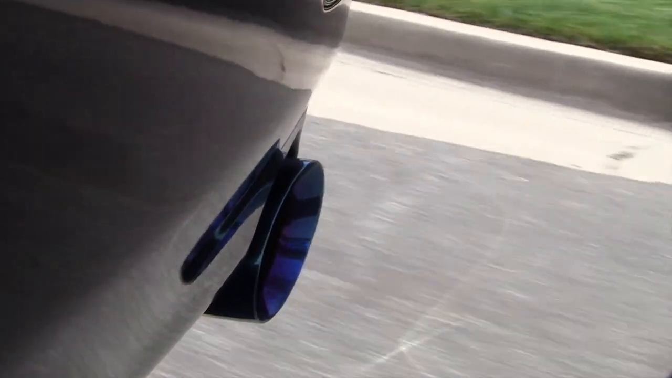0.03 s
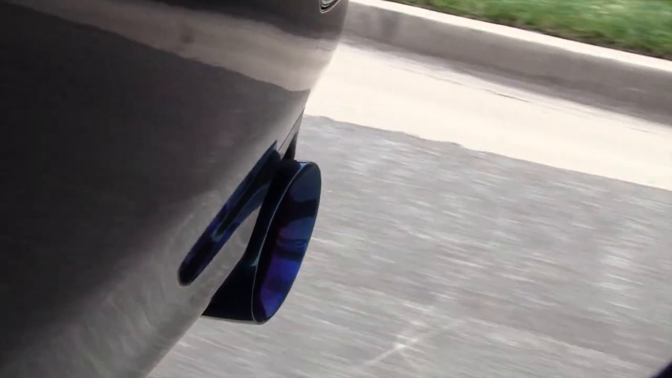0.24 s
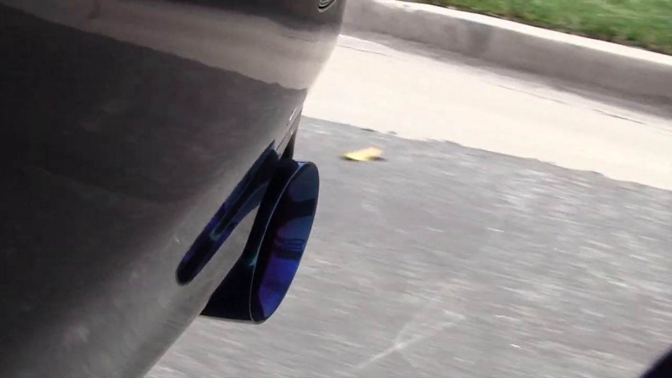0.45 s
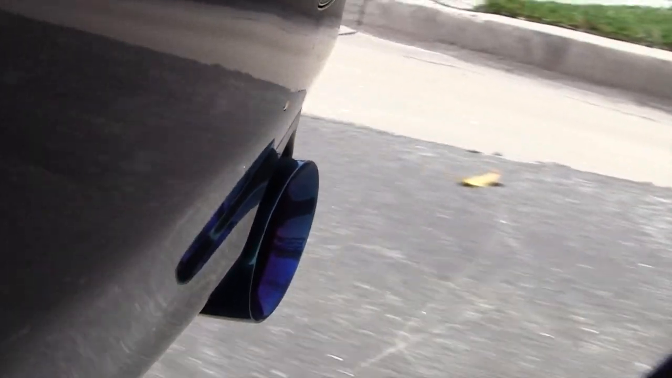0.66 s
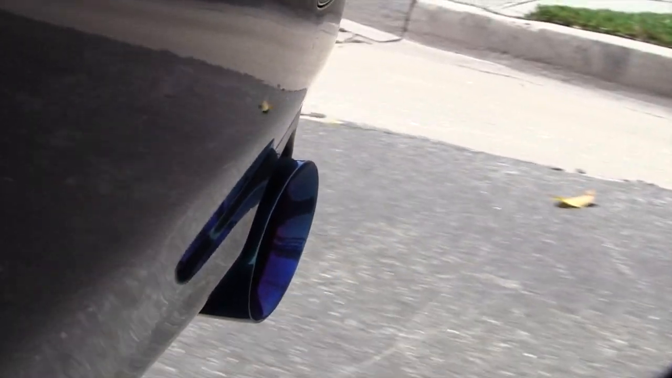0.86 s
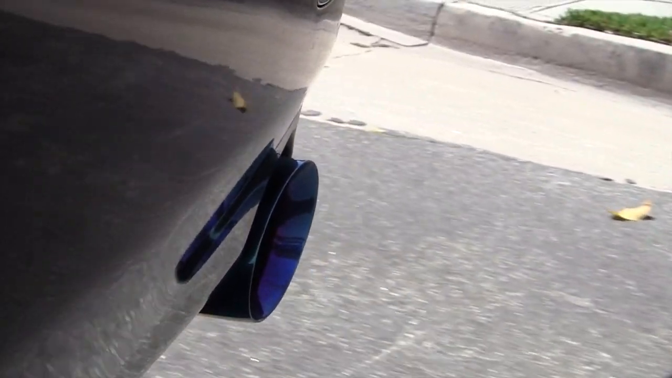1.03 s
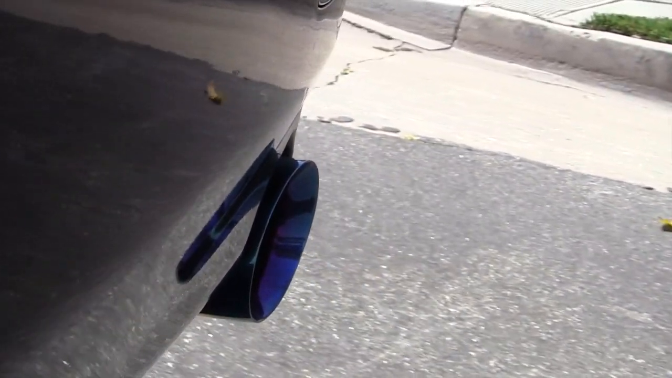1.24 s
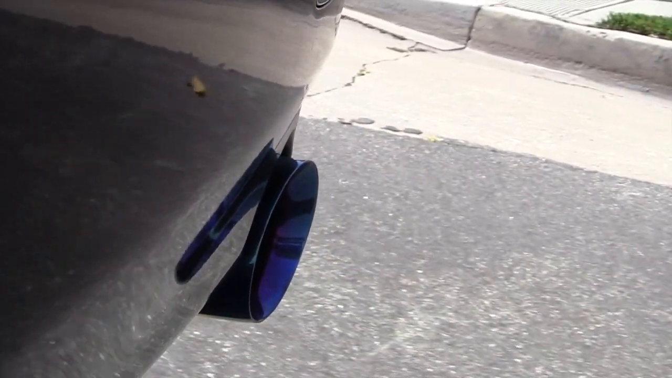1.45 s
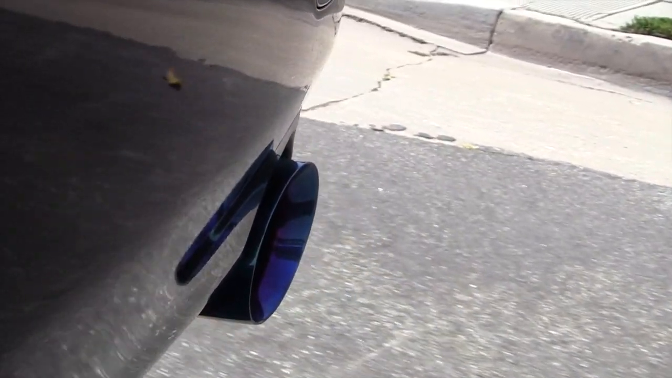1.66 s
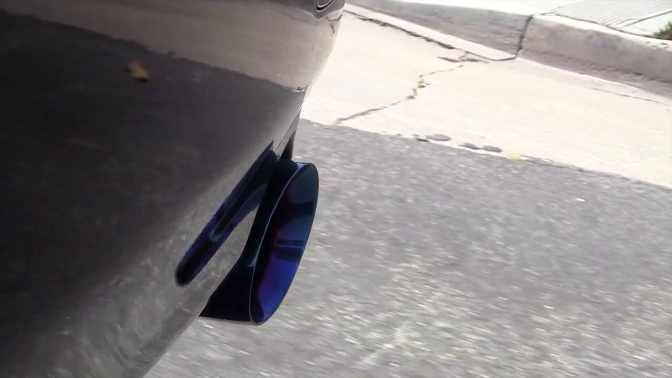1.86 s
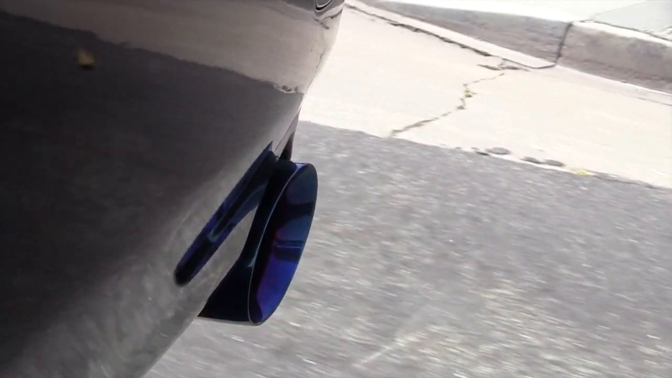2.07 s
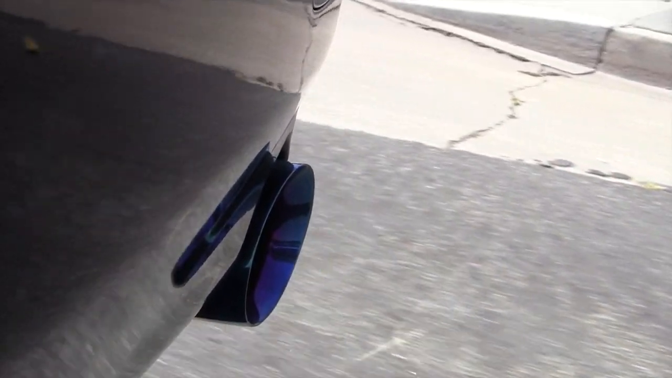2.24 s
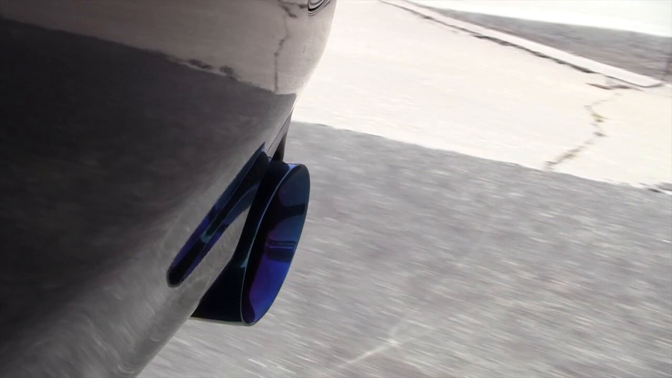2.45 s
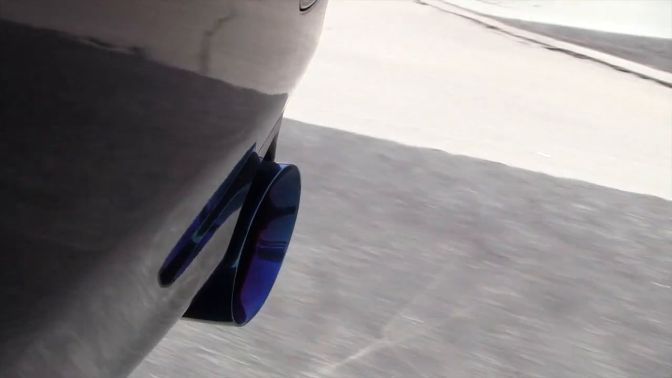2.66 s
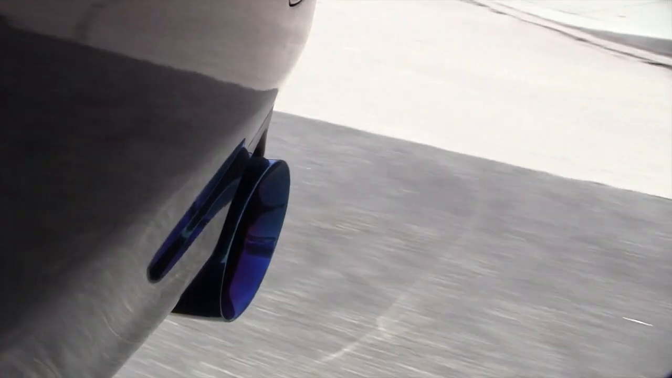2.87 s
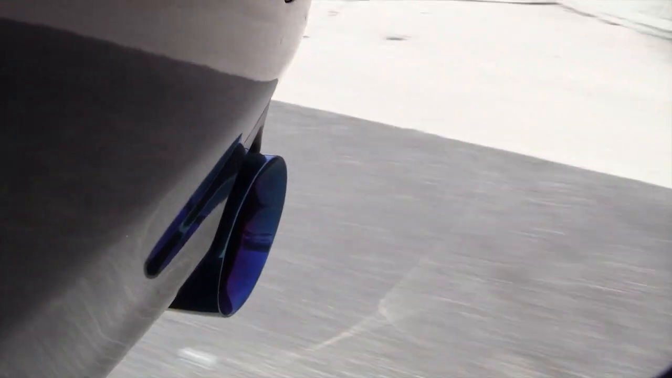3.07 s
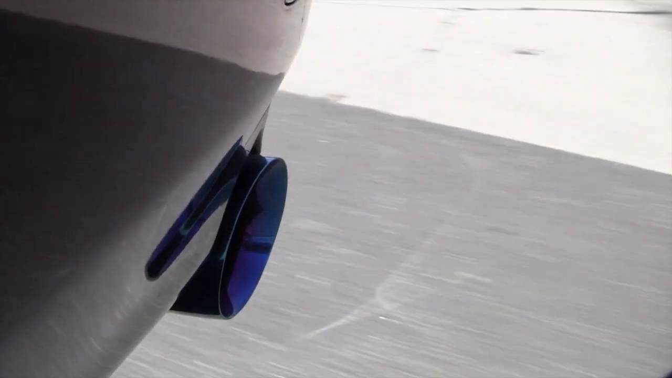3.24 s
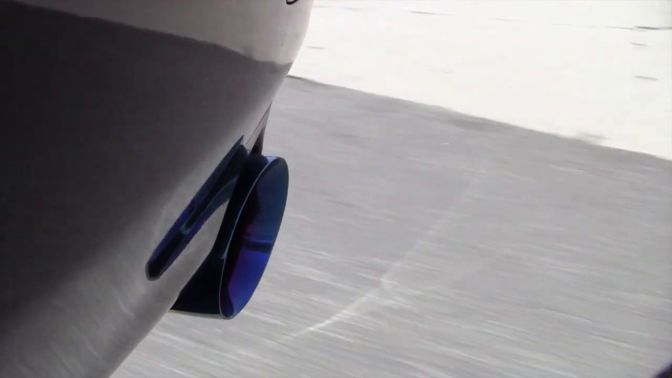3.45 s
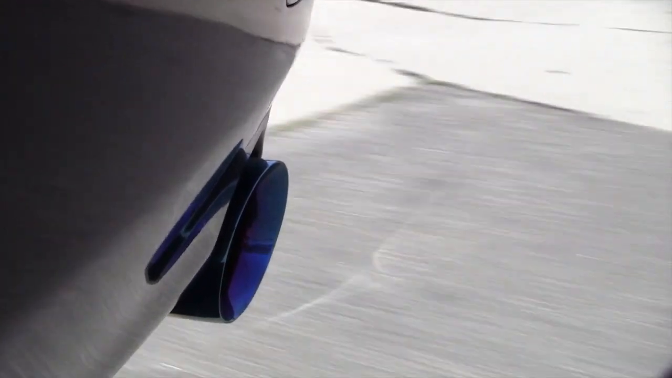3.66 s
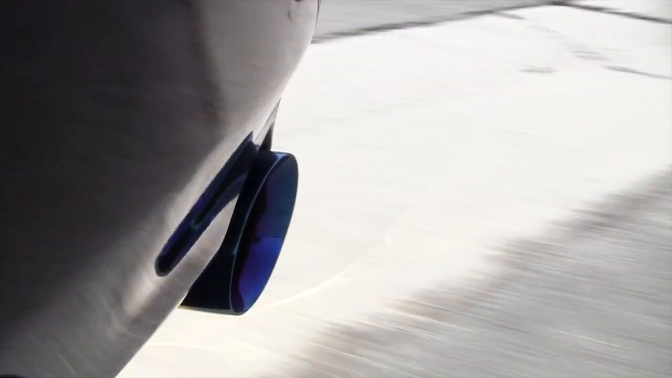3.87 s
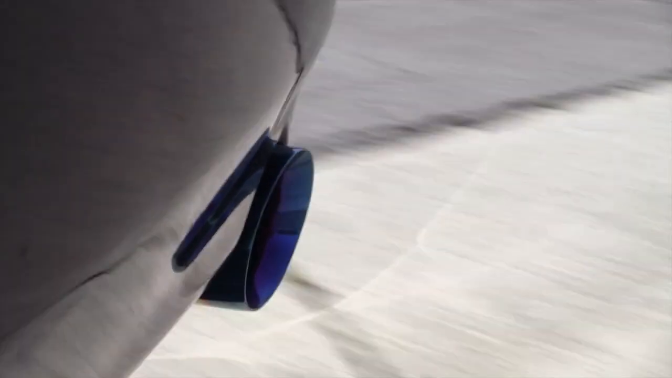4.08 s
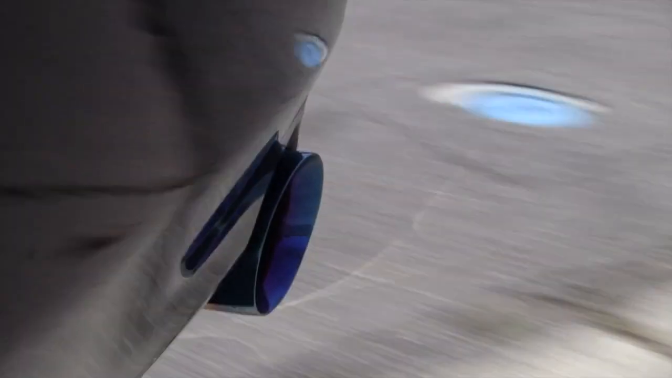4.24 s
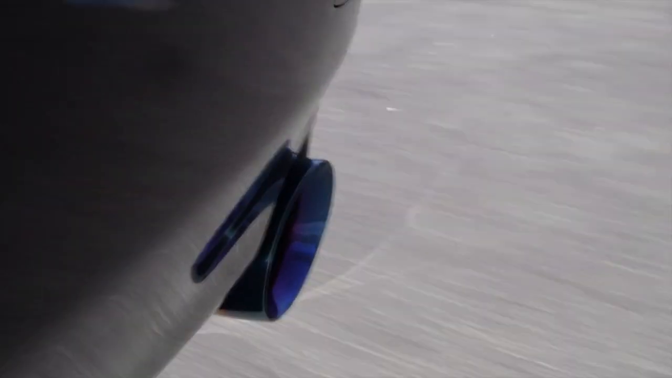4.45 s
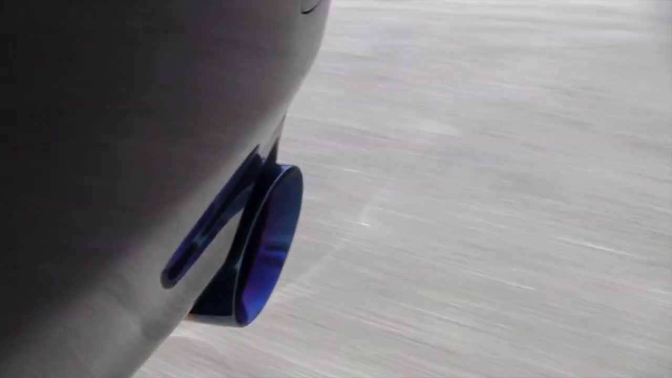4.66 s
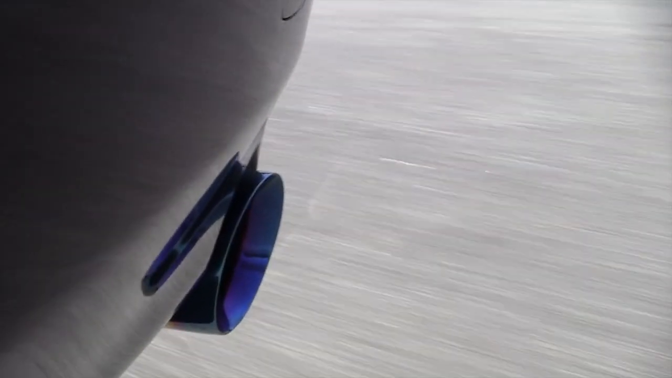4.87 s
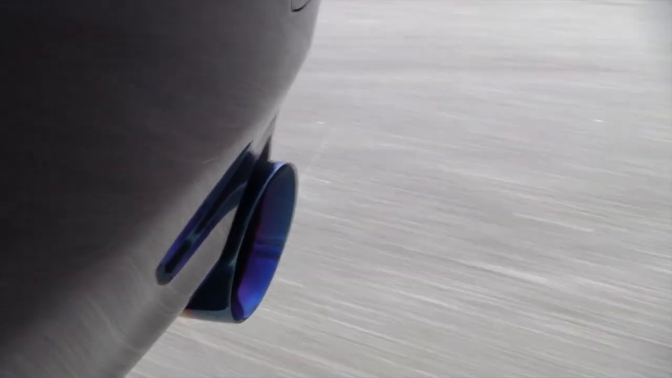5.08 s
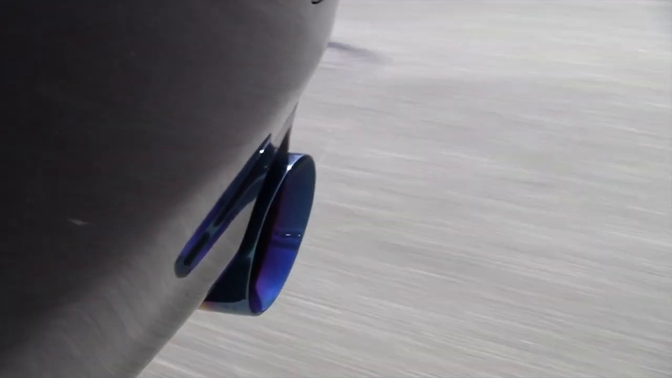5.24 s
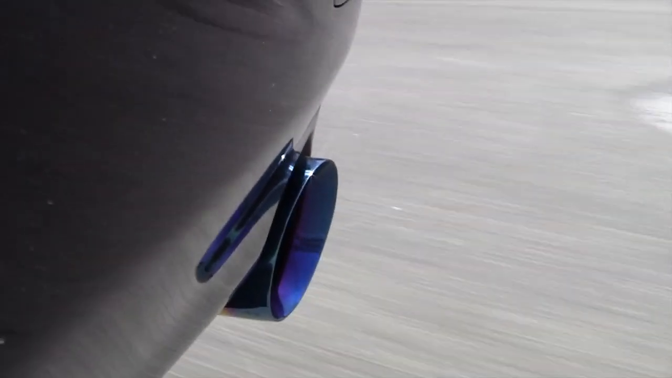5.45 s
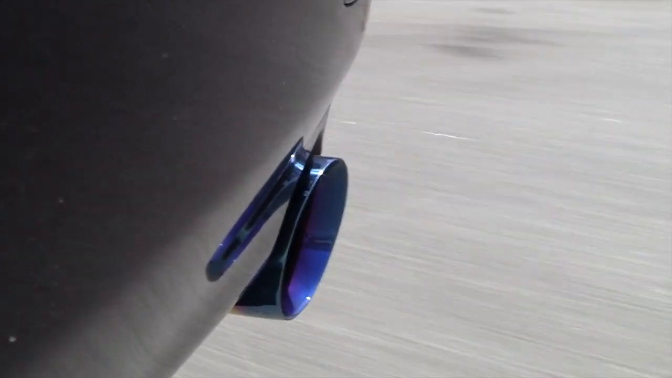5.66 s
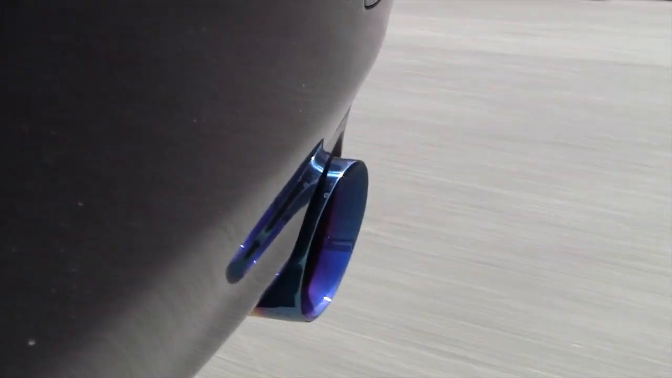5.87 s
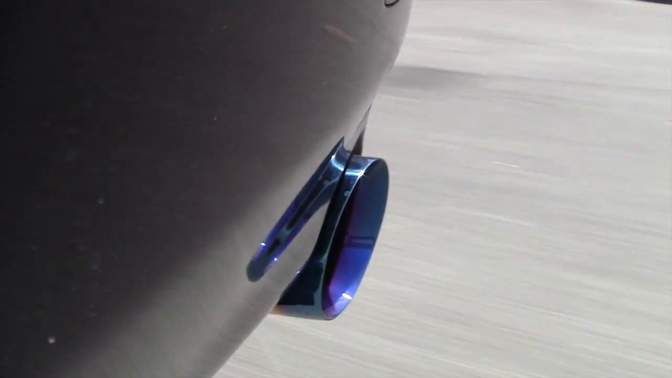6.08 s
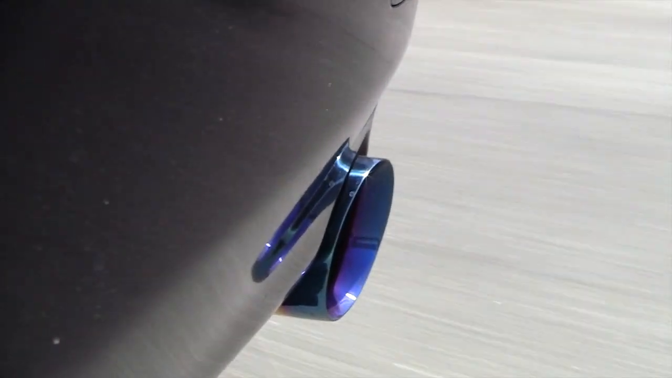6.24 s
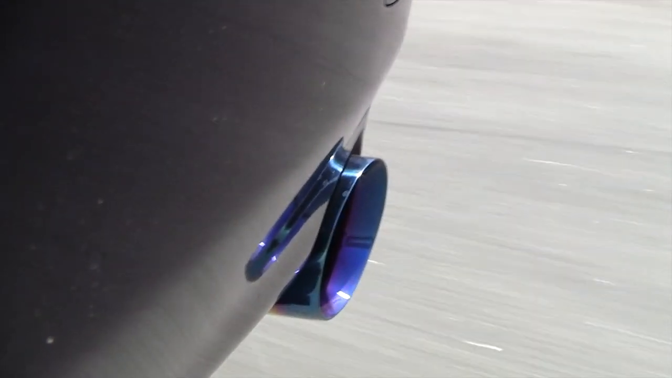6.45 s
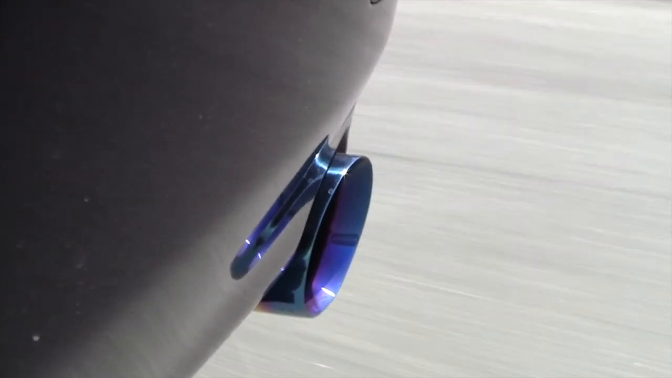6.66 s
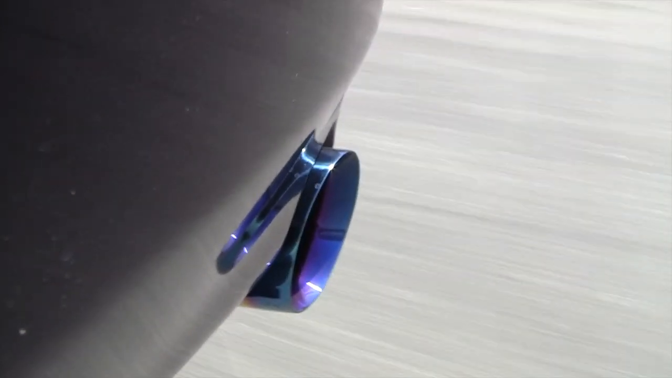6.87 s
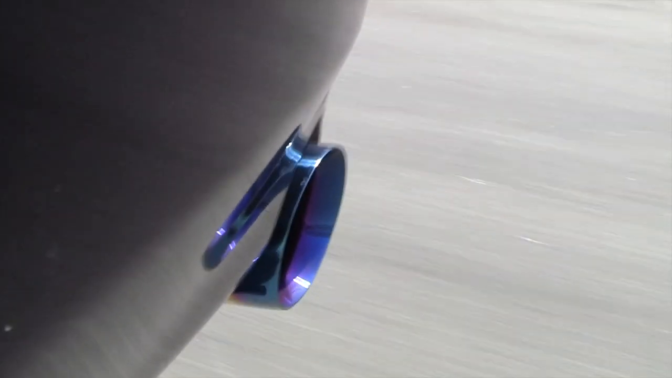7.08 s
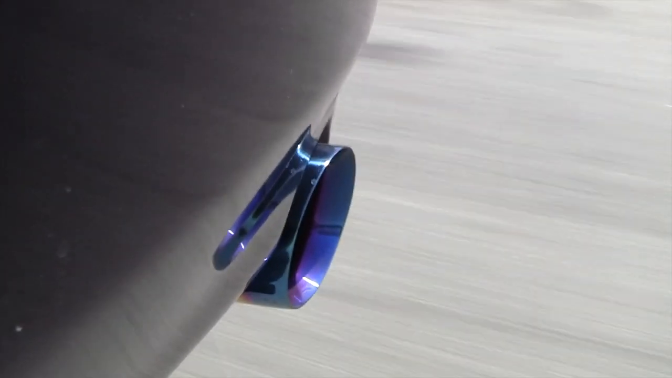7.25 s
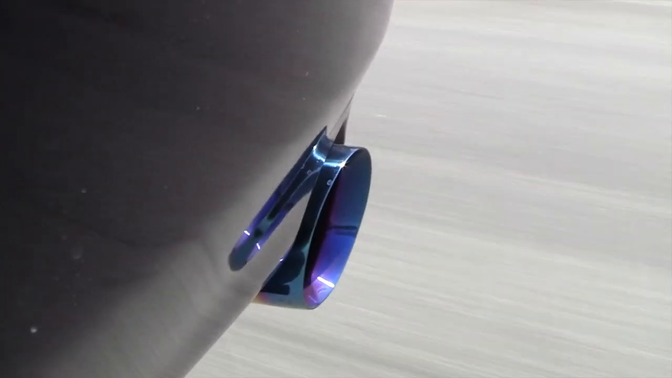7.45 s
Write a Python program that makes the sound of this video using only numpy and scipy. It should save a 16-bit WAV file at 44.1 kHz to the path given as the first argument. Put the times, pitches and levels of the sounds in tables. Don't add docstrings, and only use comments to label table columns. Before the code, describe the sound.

Outdoors on a street, a small stereo microphone sits close beside a six-cylinder car's free-flowing tailpipe. From 0 to 0.9 seconds the quiet, low exhaust burble drops in pitch as the car rolls to a stop. Until about 1.9 it idles unevenly, soft and fluttering, over muted tyre and street noise; tiny high brake squeaks come between 0.8 and 1.8, with a lower suspension tick at 1.4. At 2.0 the throttle opens and the pulses thicken into a deep boom, loudest around 3 to 4 and rising steadily. Grit crackles from 2.6 to 5.6, densest around 4 to 4.6, with a sharp crunch at 4.04. Rushing gas and tyre hiss swell, peak near 4.9, and ease slightly. From 5.7 to 7.5 the pitch climbs smoothly to a hard, slightly rough howl, with air rush swelling again, cut off still rising.

```python
import sys
import numpy as np
from scipy import signal
from scipy.fft import rfft, irfft, next_fast_len
from scipy.io import wavfile
from scipy.ndimage import map_coordinates

SR = 44100
rng = np.random.default_rng(int(sys.argv[2]) if len(sys.argv) > 2 else 0)


def ratio_of_db(decibels):
    return 10 ** (np.asarray(decibels, float) / 20)


def int16_out(signal):
    q = np.round(np.clip(np.atleast_2d(signal).T, -1, 1) * 32767)
    wavfile.write(sys.argv[1], SR, q.astype(np.int16))


N = 331191

# time in seconds, pulse strength in dB, pulse bluntness in dB per harmonic.
BURN = [(0, -20, -9.5), (.6, -19.5, -9), (.9, -19.5, -10), (1.35, -23, -8), (1.5, -24.5, -4.5),
        (1.8, -24, -6.5), (2.0, -15, -6.5), (2.15, -11.5, -6.5), (2.5, -11.5, -6.5), (2.85, -6, -8),
        (3.1, -2.5, -10), (4.2, -5.5, -8.5), (5.0, -7, -10), (5.3, -8.5, -6.8), (5.75, -8.5, -7.3),
        (6.2, -9.5, -11), (7.0, -10, -8.5), (7.51, -10, -8)]
# time in seconds, firings per second.
REVS = [(0, 38.9), (.5, 34.5), (.85, 27.8), (1.55, 30.9), (1.88, 30), (2.25, 41.5), (2.42, 46.2),
        (2.75, 52.3), (3.05, 60.6), (3.35, 65.4), (4.15, 74.4), (4.45, 84.9), (4.875, 94.8), (5.25, 107.2),
        (5.55, 120.3), (5.75, 128.0), (7.2, 193.9), (7.51, 206.2)]
# time in seconds, level in dB.
FLOW = [(0.0, -54), (0.35, -55), (1.19, -58.5), (1.92, -58.5), (3.01, -51), (3.39, -52), (4.18, -47.5),
        (4.35, -48), (4.85, -44.5), (5.85, -50.5), (6.13, -49.5), (6.42, -46.5), (7.01, -42.5),
        (7.51, -43.5)]
FLOW_REST_DB = -58
HIGH_REVS = 206


def in_time(rows):
    s, *columns = np.transpose(rows)
    return [np.interp(np.arange(N) / SR, s, c) for c in columns]


def at_hz(points, hz):
    p = np.array(points, float)
    return np.interp(np.log(hz + 1.0), np.log(p[:, 0] + 1.0), p[:, 1])


def drift(rate):
    knots = rng.standard_normal(400)
    return map_coordinates(knots, [np.arange(N) / SR * rate], order=3)


def band(x, low_hz, high_hz):
    sos = signal.butter(2, [low_hz, high_hz], "band", fs=SR, output="sos")
    y = signal.sosfilt(sos, x)
    return y / np.std(y)


def resonances_db(peaks, hz):
    return sum(db / (1 + (2 * (hz - f) / width) ** 2) for f, width, db in peaks)


def throttle():
    idle_db, loaded_db = -19, -9
    strength_db = in_time(BURN)[0]
    return np.clip((strength_db - idle_db) / (loaded_db - idle_db), 0, 1)


def rush():
    # low edge in Hz, high edge in Hz.
    reference_bands = [
        (280, 340),
        (900, 1600),
        (2500, 5000),
        (7000, 11000),
    ]
    # frequency in Hz, level in dB per Hz.
    rush_colour = [(20, -11.5), (60, -6.5), (150, 1.5), (230, -.5), (310, -0.5), (450, -8.5), (800, -13),
                   (1100, -9), (2000, -12.5), (3500, -12.5), (6000, -26), (8200, -35), (9000, -42),
                   (12000, -48.5), (15500, -59)]
    # frequency in Hz, width in Hz, lift in dB.
    whistle = [(1870, 170, 2.5), (2147, 310, 4.5), (830, 78, 4.5), (323.4, 50, -4.5)]
    # frequency in Hz, share in common from 0 to 1.
    likeness = [(60, 0.53), (110, 0.95), (200, 1), (380, 0.91), (700, 1), (1290, 0.07), (2380, 0.32),
                (4400, 0.86), (8120, 0.82), (15000, 0.85)]
    # frequency in Hz, phase in radians.
    lead = [(0, 3.5), (260, -1.12), (780, -0.5), (1380, -1.5), (2150, 1), (2500, 1.04), (3530, 0.04),
            (3880, 1.5), (5000, -2), (7490, -1.6), (8700, -0.0), (15200, -6)]
    # frequency in Hz, level in dB.
    left_db = [(60, 2), (110, 6), (200, 0), (380, -0.5), (700, -3), (1290, 5), (2380, 3.5), (4400, 3.5),
               (8120, 0), (15000, 1.5)]
    # level at rest in dB, share of the flow's swing,
    # gain at open throttle in dB, gain in dB per doubling of revs.
    follows = [(-51.5, 0.27, 4.5, 3), (-48, 0.34, -1.5, 1.5), (-62, 1.106, 0.26, 0.32),
               (-65.5, 0.87, 0.5, -0.6)]

    size = next_fast_len(N)
    hz = np.fft.rfftfreq(size, 1 / SR)
    colour = ratio_of_db(at_hz(rush_colour, hz) + resonances_db(whistle, hz))
    a, b = rfft(rng.standard_normal((2, size)))
    alike = np.clip(at_hz(likeness, hz), 0, 1)
    side = ratio_of_db(at_hz(left_db, hz) / 2)
    right = alike * a * np.exp(-1j * at_hz(lead, hz)) + np.sqrt(1 - alike ** 2) * b
    ports = colour * np.array([a * side, right / side])
    power = np.abs(ports.mean(0)) ** 2 * 2 / size ** 2
    rest_db = [10 * np.log10(power[(hz > lo) & (hz < hi)].sum()) for lo, hi in reference_bands]

    flow_db = in_time(FLOW)[0] - FLOW_REST_DB
    doublings = np.log2(in_time(REVS)[0] / 30)
    opening = throttle()
    level_db = [db + share * flow_db + open_db * opening + rev_db * doublings
                for db, share, open_db, rev_db in follows]
    swell_db = np.array(level_db) - np.array(rest_db)[:, None]

    anchors = np.log2(np.sqrt(np.prod(reference_bands, axis=1)))
    centres = np.arange(5, 14.1, .75)
    out, gust = np.zeros((2, N)), drift(9.8)
    for c in centres:
        share = np.interp(np.log2(hz + 1), centres, centres == c)
        weights = [np.interp(c, anchors, row) for row in np.eye(4)]
        gain_db = weights @ swell_db + 0.16 * gust + 0.99 * drift(25.0)
        gain_db -= .22 * (c < 7.5) * (swell_db[0] - swell_db[0].min())
        out += ratio_of_db(gain_db) * irfft(ports * share, size)[:, :N]
    return out


def squeaks():
    # time in seconds, frequency in Hz, length in seconds, level in dB.
    chirps = [
        (0.788, 3700, .02, -56),
        (1.0, 3680, .012, -55),
        (1.203, 3680, .008, -55),
        (1.4, 3690, .015, -58),
        (1.45, 3690, .015, -61),
        (1.42, 2240, 0.006, -42.5),
        (1.42, 2800, .006, -63),
        (1.6, 3700, .015, -56),
        (1.83, 3700, .04, -59),
    ]
    t = np.arange(N) / SR
    out = np.zeros(N)
    for s, hz, length, db in chirps:
        out += ratio_of_db(db) * np.exp(-((t - s) / length) ** 2) * np.sin(2 * np.pi * hz * t)
    return out


def grit():
    # start in seconds, 3-6 kHz peak in dB, 1-3 kHz level in dB, 6-12 kHz level in dB.
    crushes = [(2.618, -50.5, -35, -47.5), (2.71, -41, -36, -49.5), (2.839, -36, -34, -58.5),
               (2.894, -31, -35, -52.5), (3.012, -35.5, -32, -67), (3.065, -33.5, -30.5, -61.5),
               (3.403, -34.5, -31, -59), (3.579, -33.5, -30, -62), (3.76, -28.5, -41.5, -30.5),
               (3.835, -30, -29.5, -54), (3.949, -23.5, -44, -37), (3.999, -36, -44, -32.5),
               (4.029, -27.5, -36, -46.5), (4.041, -15.5, -15.5, -35.5), (4.064, -27.5, -30, -43),
               (4.102, -28, -42, -41), (4.137, -26, -23, -47.5), (4.148, -24.5, -22.5, -50),
               (4.227, -30, -34.5, -48), (4.294, -31.5, -39, -49.5), (4.377, -30, -29, -51.5),
               (4.461, -37.5, -46, -47.5), (4.527, -20, -32, -39), (4.62, -28, -29, -53.5),
               (4.733, -30.5, -34, -64), (5.001, -26, -38, -50), (5.068, -33.5, -39, -49),
               (5.155, -35.5, -43, -50.5), (5.358, -35.5, -42, -50.5), (5.634, -28, -29, -49.5)]
    # frequency in Hz, width in Hz, level in dB.
    shell = [(965, 220, -0.5), (1960, 430, 1), (2800, 460, 0)]
    crush_s = 0.0038

    grains = rng.standard_normal((2, N)) * ratio_of_db(5.0 * np.minimum(rng.exponential(1, N), 4))
    grains = grains[0] + 0.22 * grains[1] * [[1], [-1]]
    dull = sum(ratio_of_db(db) * band(grains, hz - width / 2, hz + width / 2) for hz, width, db in shell) / 2
    middle, bright = band(grains, 3600, 6380), band(grains, 4900, 10000)
    t = np.arange(int(.08 * SR)) / SR / crush_s
    shape = 4.75 * t ** 2 * np.exp(-t)
    out = np.zeros((2, N))
    for s, peak_db, dull_db, bright_db in crushes:
        at = slice(int(s * SR), int(s * SR) + len(t))
        burst = ratio_of_db(dull_db - 16.5) * dull[:, at]
        burst += ratio_of_db(peak_db - 21.5) * middle[:, at]
        burst += ratio_of_db(bright_db - 21.0) * shape * bright[:, at]
        out[:, at] += shape * burst
    return out * ratio_of_db([[1.2], [-1.2]])


def tip_ring():
    tip_hz, width_hz = 1315, 80
    ring = band(rng.standard_normal(N + 8), tip_hz - width_hz / 2, tip_hz + width_hz / 2)
    ports = np.array([ring[8:], ring[:-8]]) * ratio_of_db([[2.5], [-2.5]])
    flow_db = in_time(FLOW)[0] - FLOW_REST_DB
    return ports * ratio_of_db(-64 + 0.52 * flow_db + 13.5 * throttle() + 2.8 * drift(11.0))


def harmonic_db(order, rate):
    # frequency in Hz, level in dB.
    boom = [(28, -40.5), (45, -17.5), (62, -10.5), (125, .5), (210, -.5), (280, -9), (860, -9.5),
            (1100, -18.5)]
    # frequency in Hz, width in Hz, gain in dB.
    chambers = [(290, 51, -4), (323, 30.0, -13.5), (385.0, 50.0, 1.5), (455.0, 60.0, -1.4),
                (588.7, 100, 10.5), (680, 50.0, -5), (753, 120, 5.5)]
    strength_db, blunt_db = in_time(BURN)
    hz = order * rate
    rasp_db = (order >= 4) * (2 - 5 * (order - 4))
    pulse_db = strength_db + blunt_db * min(order - 1, 3) + rasp_db
    return pulse_db + at_hz(boom, hz) + resonances_db(chambers, hz)


def pipe_turn(hz):
    # chamber frequency in Hz, lag in radians.
    chamber_lags = [(320, 1.7), (520, 1.7), (720, 1.7)]
    pulse_lean, cutoff_hz, cutoff_lead = .5, 62, .9
    behind = sum(lag / (1 + np.exp((f - hz) / 20)) for f, lag in chamber_lags)
    return pulse_lean + cutoff_lead * (cutoff_hz / np.maximum(hz, 38)) ** 3 - behind


def exhaust():
    cylinders = [1.4, .8, -.6, -1.0, -1.2, .2]
    # frequency in Hz, level in dB.
    pipe = [(150, 0), (190, -2), (230, -12), (330, -12), (400, -14), (450, -10), (590, -8), (750, -13),
            (850, -17), (950, -26), (1200, -28), (1800, -40)]
    first_firing, left_lag_s = .355, 0.00019

    rate, = in_time(REVS)
    shut = 1 - throttle()
    high = (rate / HIGH_REVS) ** 2
    scatter_db = .17 + (2.3 - .17) * shut
    uneven_db = .3 + (1.4 - .3) * shut + 1.15 * high
    firing = first_firing + np.cumsum(rate) / SR
    count = np.arange(900)
    luck = rng.standard_normal((900, 3))
    cylinder = np.interp(firing, count, np.array(cylinders)[count % 6])
    soft, sharp, late = [np.interp(firing, count, luck[:, k]) for k in range(3)]
    shift = .004 * scatter_db * late + .008 * uneven_db * np.roll(cylinder, 300)
    angle = 2 * np.pi * (firing + shift)

    out = np.zeros((2, N))
    for k in range(1, 9):
        hz = k * rate
        level_db = harmonic_db(order=k, rate=rate)
        edge = 2.5 * np.clip((hz - 220) / 250, 0, 1)
        wobble_db = scatter_db * (.7 * soft + 2.5 * edge * sharp) + uneven_db * (.7 + edge) * cylinder
        smear = .22 * scatter_db * drift(6.0 + k) * (k > 1)
        lag = 2 * np.pi * left_lag_s * hz * np.clip((330 - hz) / 80, -.2, 1) * [[1], [0]]
        wave = np.cos(k * angle + pipe_turn(hz) + smear - lag)
        out += np.sqrt(2) * ratio_of_db(level_db + wobble_db) * wave

    first_db = harmonic_db(order=1, rate=rate)
    for share, db in ((1 / 3, -36), (2 / 3, -39), (3 / 2, -20)):
        beat_db = first_db + db + 2 * at_hz(pipe, share * rate) + 1.2 * late
        out += np.sqrt(2) * ratio_of_db(beat_db) * uneven_db ** 2 * np.cos(share * angle)

    for sixth in (20, 21, 22, 23, 26, 27):
        chamber = np.exp(-(2 * (rate * sixth / 6 - 740) / 170) ** 2 / 2)
        out += ratio_of_db(-36.5) * chamber * high * np.cos(sixth / 6 * angle + sixth ** 2)
    return out * ratio_of_db([[.3], [-.3]])


def scene():
    return rush() + squeaks() + grit() + tip_ring() + exhaust()


def band_limit(x):
    return signal.sosfilt(signal.butter(12, 15690, fs=SR, output="sos"), x)


def record(dry):
    hiss = ratio_of_db(-68.5) * band(rng.standard_normal(N), 6500, 14000)
    roll_off = signal.butter(2, 18, "high", fs=SR, output="sos")
    mix = signal.sosfilt(roll_off, dry + hiss)
    return band_limit(mix)


dry = scene()
out = record(dry)
int16_out(out)
```